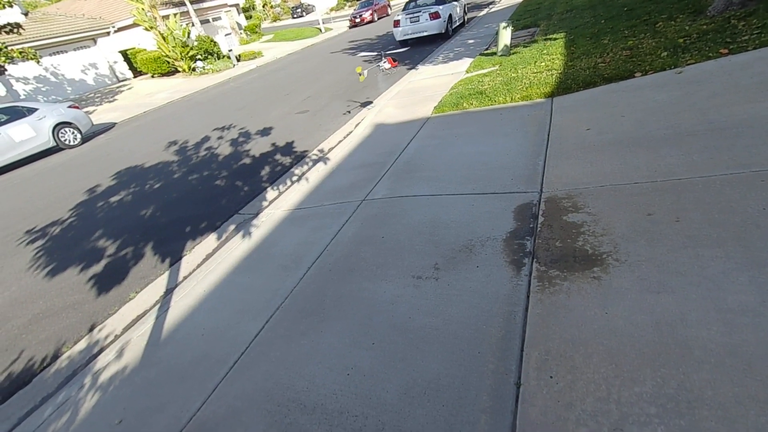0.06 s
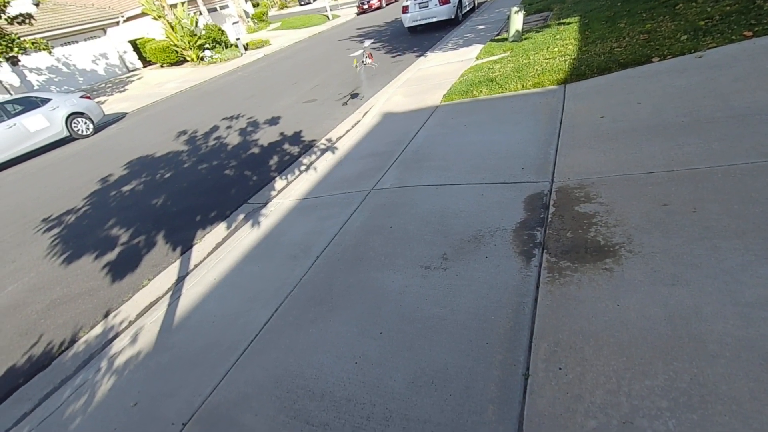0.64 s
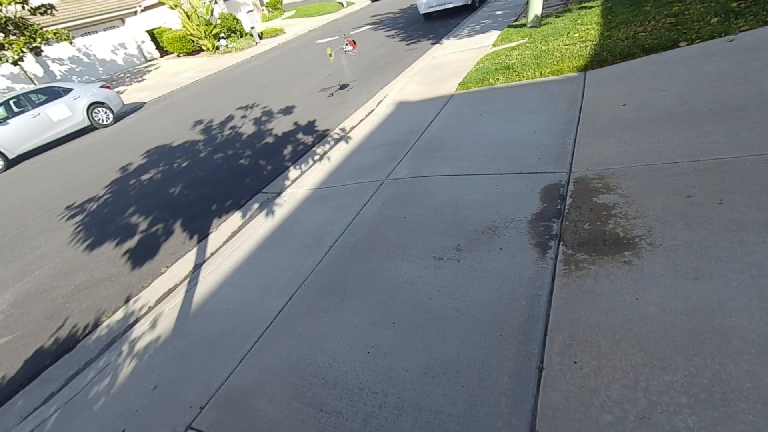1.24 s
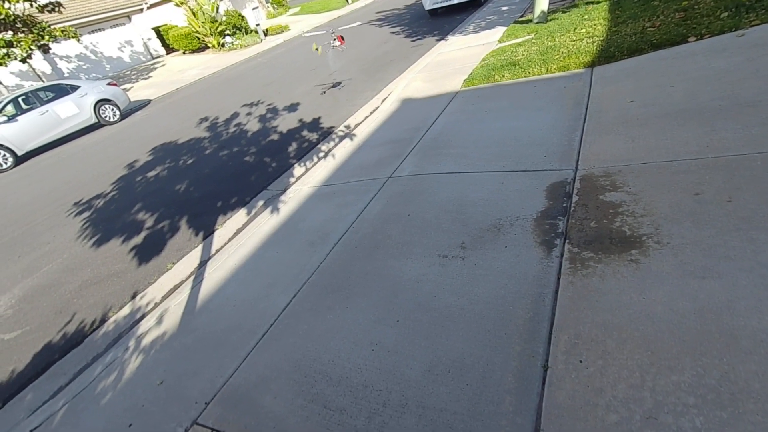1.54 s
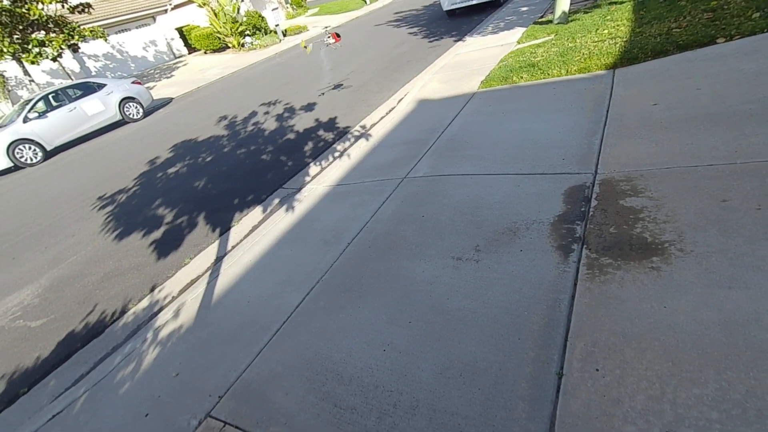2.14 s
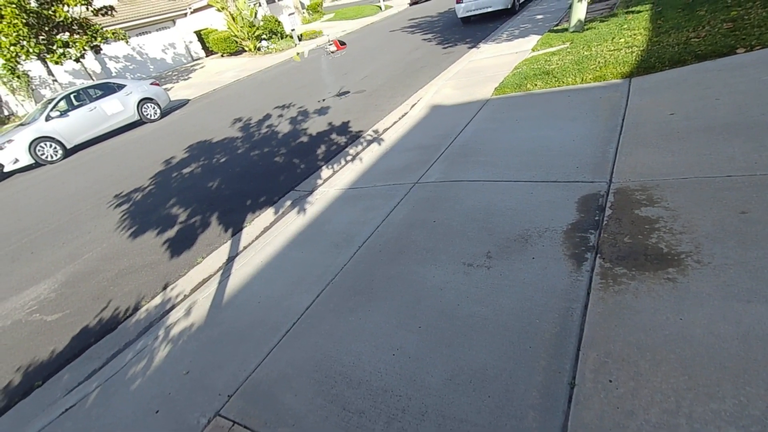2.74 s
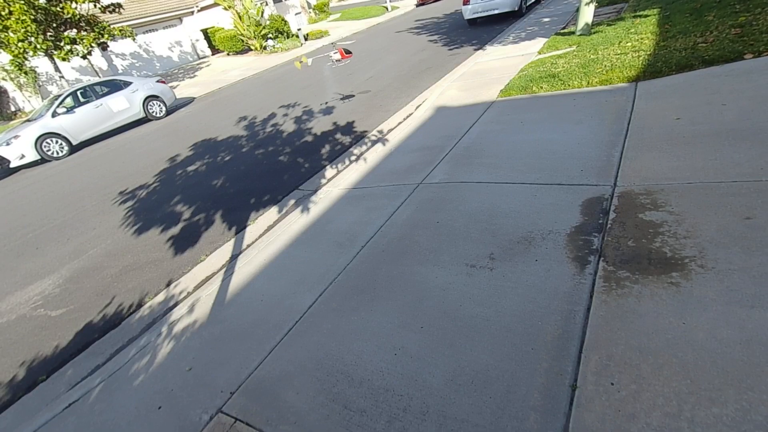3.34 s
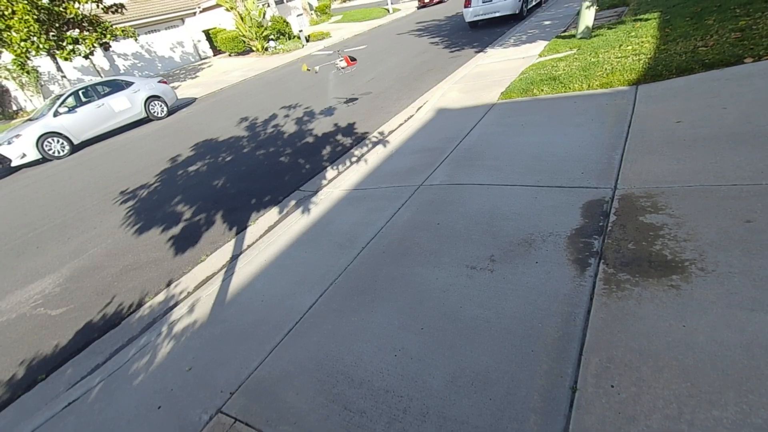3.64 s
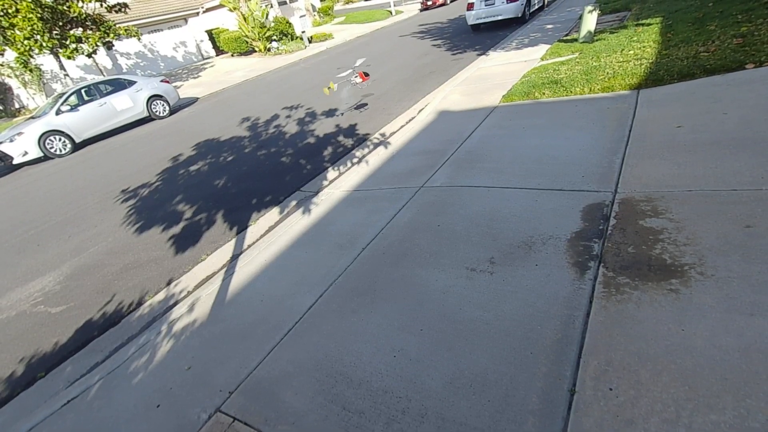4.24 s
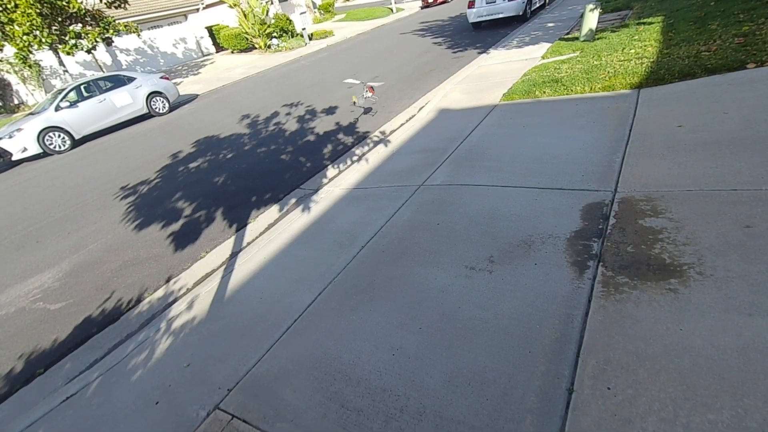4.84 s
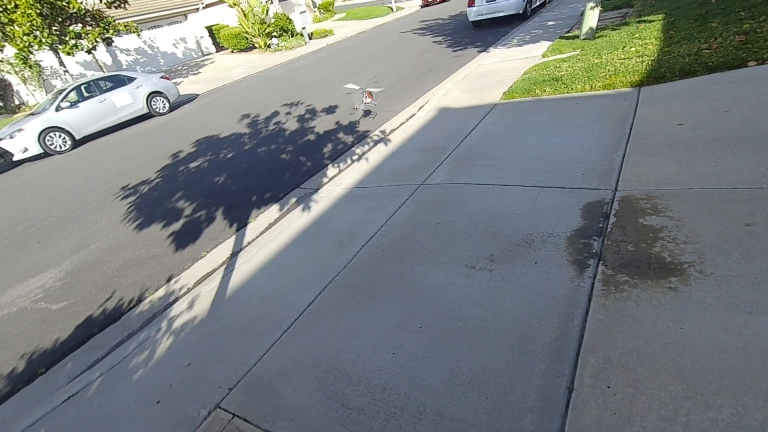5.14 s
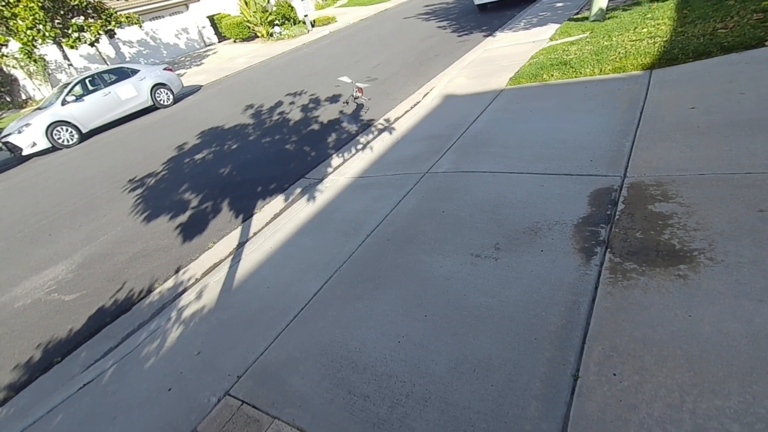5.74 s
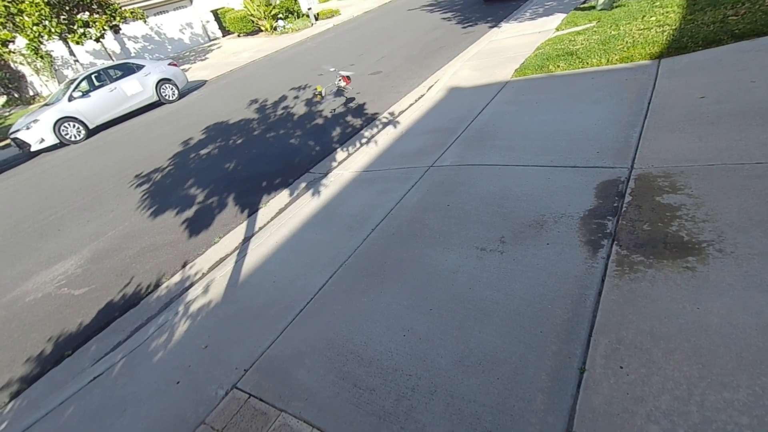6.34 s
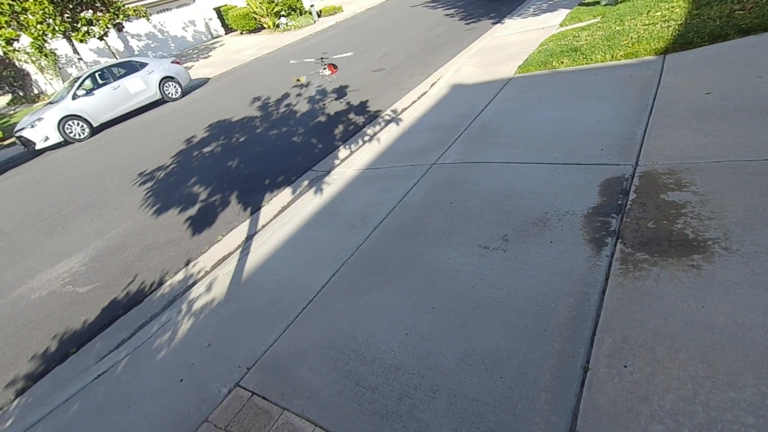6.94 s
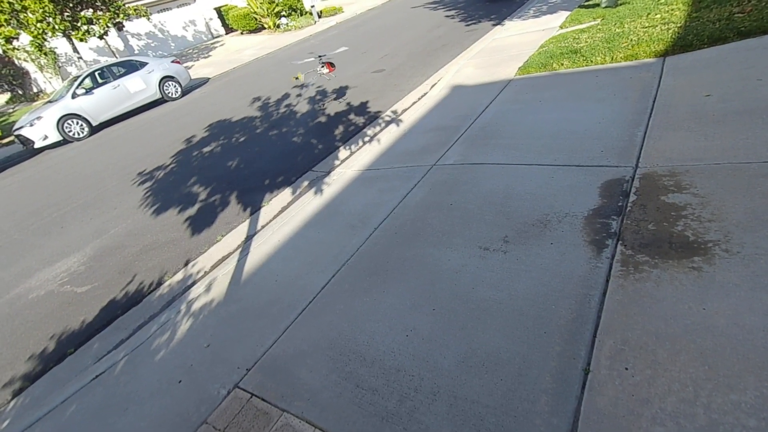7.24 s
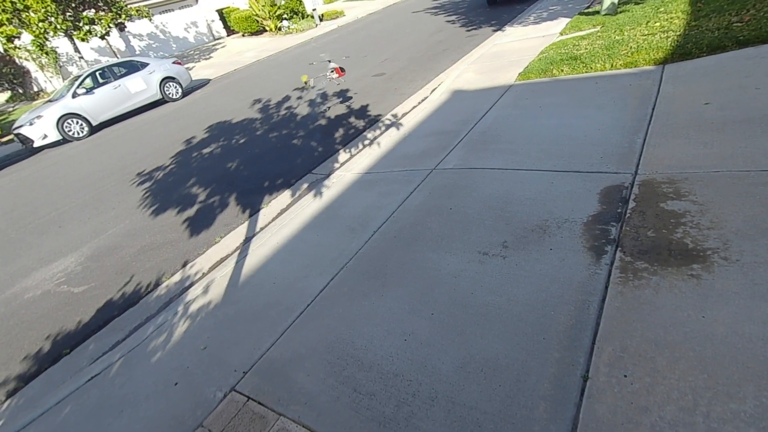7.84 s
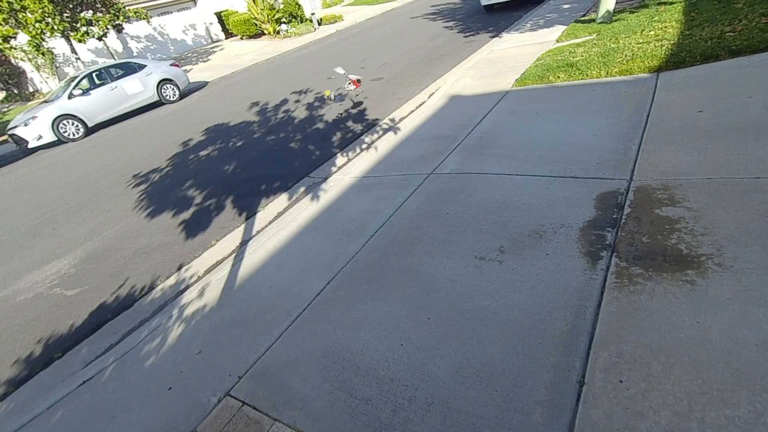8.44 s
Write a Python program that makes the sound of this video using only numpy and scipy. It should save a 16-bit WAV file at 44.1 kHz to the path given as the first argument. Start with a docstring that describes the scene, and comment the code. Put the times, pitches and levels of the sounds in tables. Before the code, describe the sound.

Outdoors on a street, the tiny fuel engine of a hovering model helicopter buzzes without a break, heard from a few metres away. The buzz is thin and nasal, with a ringing high whine whose colour keeps shifting as the model turns, rises and dips. The engine speed barely changes, though the loudness drifts down and comes back up. Beneath it are a light hiss of gears and a faint flutter of blades, with slight echoes from walls.

```python
"""On a street, a small model helicopter with a glow engine hovers a few metres away.
Its two-stroke engine runs rich (extra fuel) and fires hard only on every other turn. Each pop rings
in the muffler, and the pops blur into a buzzing whine. Gears hiss, and the rotor throbs underneath.
The road mirrors the sound. That echo lags more as the model climbs, so the whine sweeps up and down."""
import sys
import numpy as np
from scipy import signal
from scipy.fft import rfft, irfft, next_fast_len
from scipy.io import wavfile
from scipy.ndimage import uniform_filter1d, map_coordinates

SR = 44100
rng = np.random.default_rng(int(sys.argv[2]) if len(sys.argv) > 2 else 0)


def unload_wav(signal):
    """Save mono or channel-first audio to the path in sys.argv[1] as 16-bit WAV at rate SR, clipped to [-1, 1]."""
    wavfile.write(
        sys.argv[1],
        SR,
        np.round(np.clip(np.atleast_2d(signal).T, -1, 1) * 32767).astype(np.int16),
    )


N = 378819
T = np.arange(N) / SR
FIRINGS_PER_ROTOR_TURN = 3.965

# hard firings per second: t/s, f/Hz
FIRING_RATE = [(0.0, 128.2), (0.07, 127.5), (0.36, 129.1), (0.6, 128.6), (0.88, 127.2), (1.17, 127.3),
               (1.32, 126.2), (1.53, 126.6), (1.7, 125.6), (1.94, 125.9), (2.27, 125.1), (3.64, 126.1),
               (3.92, 124.3), (4.55, 126.4), (4.71, 125.7), (5.28, 128.0), (5.53, 126.4), (5.86, 125.7),
               (6.15, 127.1), (6.29, 126.0), (6.87, 124.9), (7.25, 125.4), (7.63, 125.0), (8.21, 126.3),
               (8.4, 127.8), (8.59, 127.8)]
# the exhaust outlet points toward us or away: t/s, level/dB, extra rasp/dB, extra treble/dB
BEAM = [(0, -14, 2.5, 4.5), (.65, -10.5, 1.5, 2), (1.2, -14.5, 3, 3.5), (1.55, -16, 4, 5.5),
        (2.25, -17.5, 5, 5), (3.1, -19.5, 2.5, 3.5), (3.75, -21, 4.5, 5.5), (4.2, -14, 2.5, 3.5),
        (4.7, -14, 2.5, 6.5), (5.3, -15.5, 8, 4.5), (5.55, -15.5, 7, 4), (5.9, -12, 4.5, 6.5),
        (6.15, -12, 3.5, 5), (6.7, -10.5, 2, 4), (7, -16.5, 1, 6), (7.4, -15, 3.5, 6.5), (7.75, -13, -1, 4),
        (8.59, -10, 2, 3)]
# gain of the highest fizz: t/s, level/dB
FIZZ = [(0, -3), (.25, -3), (.6, -6), (2.5, 0), (3.2, -2.5), (3.7, 0), (4.7, -4.5), (5.3, -1.5),
        (5.6, -3.5), (5.88, -1), (6.15, -5), (6.7, -5), (7, -0.5), (8.59, -5.5)]
# tone colour of the whole exhaust: f/Hz, level/dB
EXHAUST_COLOUR = [(60, -42), (126, -18), (370, -15), (520, -4), (800, 0), (1300, -2), (1750, 0),
                  (2000, -1.5), (2900, 2), (4100, -2.5), (5200, -4.5), (7200, -8), (9200, -9.5),
                  (11000, -4.5), (15700, -7.5)]
# tone colour of a puff of gas before the muffler: f/Hz, level/dB
PUFF_COLOUR = [(200, -36), (1000, -7.5), (2500, -5.5), (3400, 1), (4200, 1.5), (5200, -2.5), (8000, 4.5),
               (15000, 1.5)]
# pitches that the muffler and frame boost or weaken: f/Hz, width/Hz, level/dB
RESONANCES = [(1757, 45, 4), (1860, 62, 9), (2085, 100, 1.5), (2300, 92, 0), (2230, 130, 4),
              (2910, 110, -10.5), (3360, 150, -0.5), (3470, 380, 1.5), (3530, 390, 3), (4000, 200, -2),
              (4093, 160, 5), (4810, 49, 4), (5170, 680, -2.5), (5730, 81, 7.5), (5930, 380, 5.5),
              (8050, 390, 3.5), (8310, 310, 3.5), (10260, 410, 7.5), (12060, 300, 7.5), (12580, 260, 6.5),
              (13600, 490, 7.5), (16000, 1400, 3)]
# loudness of the engine's whine in five side-by-side bands from 1.7 to 3.7 kHz,
# each named for how it sounds: t/s, level/dB
NASAL_RING = [(0.0, -27), (0.55, -22.5), (1.25, -28.5), (1.95, -23), (2.05, -27.0), (2.75, -24.5),
              (3.55, -27.5), (4.0, -32), (4.3, -23), (4.85, -29.5), (5.35, -22.5), (5.6, -29), (6.0, -28.0),
              (6.4, -21.0), (6.95, -27.0), (7.95, -29), (8.05, -22), (8.59, -20)]
WHISTLE_RING = [(0.0, -25.5), (0.6, -26.5), (1.4, -21.5), (1.85, -25.5), (2.1, -21), (2.7, -26.5),
                (2.95, -24.5), (3.3, -29.5), (4.15, -23.5), (4.35, -25.0), (4.95, -23), (5.05, -29.5),
                (6.15, -25), (6.5, -27.0), (7.0, -20), (8.05, -21.5), (8.25, -27.5), (8.59, -18.0)]
MID_RASP = [(0.0, -22), (0.5, -25.5), (1.4, -30.5), (1.7, -28.5), (3.7, -29), (3.9, -32), (4.25, -26),
            (4.55, -28), (4.75, -23.5), (5.55, -27.5), (5.9, -24), (6.35, -28), (6.5, -26), (7.9, -28.5),
            (8.05, -25), (8.59, -26)]
LOW_WHINE = [(0.0, -21.5), (0.2, -25), (1.05, -19), (1.4, -26.5), (1.65, -20), (2.85, -31.5), (3.4, -22.0),
             (3.9, -27), (4.25, -24), (4.45, -26), (4.6, -18.5), (4.95, -26), (5.35, -20.5), (5.9, -26.0),
             (6.2, -16.5), (6.35, -21.5), (6.85, -19), (7.1, -25.5), (7.65, -28), (8.0, -19.0), (8.35, -29),
             (8.59, -19)]
HIGH_WHINE = [(0.0, -25.5), (0.75, -21), (1.15, -27.5), (1.45, -20.0), (1.8, -26), (2.15, -21.5),
              (3.3, -26), (3.85, -23), (4.05, -28.0), (4.25, -16.5), (4.5, -32), (4.6, -17), (5.0, -24.5),
              (5.1, -18), (5.8, -24.5), (6.15, -16), (6.35, -27), (6.65, -17.0), (6.95, -30), (7.2, -20.5),
              (7.75, -24.5), (8.1, -18), (8.59, -24)]
# those bands: lower f/Hz, upper f/Hz, level table, overtone that sings in it, its boost/dB
WHINE_BANDS = [(1690, 2120, NASAL_RING, 16, 5), (2120, 2600, WHISTLE_RING, 18, 0),
               (2600, 3080, MID_RASP, 22, 2), (3080, 3440, LOW_WHINE, 26, 5),
               (3440, 3740, HIGH_WHINE, 28, 7)]
# low overtones with their own level curves: multiple of the firing rate -> rows of t/s, level/dB
OVERTONE_CURVES = { 1: [(0.0, -43), (1.0, -36.5), (3.6, -43.5), (4.35, -36), (5.6, -36.0), (7.15, -39.5),
                   (7.25, -41), (8.59, -36.5)], 3: [(0, -64), (.6, -50), (3.6, -49), (4.3, -57), (4.7, -43),
                   (5.35, -33.5), (6.1, -43.5), (6.6, -62), (8.59, -54)], 4: [(0.0, -43.0), (1.05, -46),
                   (1.9, -33), (4.45, -44.5), (5.35, -37.5), (5.55, -48), (5.65, -37.5), (6.55, -41),
                   (7.3, -36.5), (8.59, -42)], 6: [(0.0, -42.0), (0.55, -36), (0.95, -52.5), (1.1, -39.5),
                   (3.55, -39.5), (3.95, -30.5), (5.2, -53), (5.3, -41.0), (5.7, -59), (6.35, -35.5),
                   (8.59, -37)], 7: [(0.0, -32.5), (1.6, -31), (1.8, -38), (3.35, -39), (4.3, -31),
                   (4.75, -52), (4.9, -40), (6.6, -29.5), (7.25, -31.5), (8.59, -37)], 8: [(0.0, -29),
                   (0.85, -28.5), (2.05, -46), (2.55, -33), (2.85, -43.5), (4.2, -38), (4.4, -33),
                   (5.65, -35), (6.1, -30.5), (7.4, -37.5), (8.59, -27)], 10: [(0.0, -34), (0.65, -54),
                   (0.7, -39), (3.7, -32), (4.15, -37), (4.75, -29.5), (5.15, -37.5), (6.1, -33.5),
                   (6.5, -42), (7.65, -32), (8.0, -45), (8.59, -30.0)], 12: [(0.0, -29), (1.0, -27),
                   (2.3, -32.5), (2.4, -28.5), (3.15, -31.5), (3.75, -40), (3.9, -31), (4.65, -29),
                   (4.75, -40.5), (5.05, -31), (5.2, -43), (5.6, -29), (5.85, -44), (6.25, -29.5),
                   (6.85, -29.5), (7.0, -38), (8.15, -28.5), (8.59, -33)]}
# low overtones with one base level each: multiple of the firing rate, level/dB, share of road echo
OVERTONE_LEVELS = [(5, -39.5, 0.47), (9, -39, 0.38), (11, -43, 0), (13, -40, 0)]
# hum of the crankshaft: t/s, level/dB
CRANK_HUM = [(0.0, -24), (0.12, -24), (1.1, -32), (2.87, -30.5), (4.11, -25.5), (4.55, -21), (5.91, -19),
             (7.15, -24.5), (8.54, -20.5), (8.59, -21)]
# tones of the main and tail rotors: multiple of the main rotor's turning rate, level/dB
ROTOR_TONES = [(2, -44.5), (3, -55), (3.43, -51.5), (5, -54), (7, -53), (9, -49.5), (10, -47.5), (11, -62),
               (13, -48), (14, -52), (15, -49), (17, -49.5), (18, -51)]
# air stirred by the blades, plus street rumble: f/Hz, level/dB
WASH_COLOUR = [(8, -6), (25, 15), (50, 14), (80, -8), (120, 13), (200, 6.5), (400, 12.5), (800, -3.5),
               (1500, -7), (3000, -33), (15000, -35)]
# gear hiss before the muffler and frame colour it: f/Hz, level/dB
HISS_COLOUR = [(400, -6), (900, -4), (1500, -4.5), (2600, 3), (3400, -4), (5000, 4.5), (9000, -21.5),
               (15000, -28)]
# the model climbs and sinks twice above the road: t/s, height/m
HEIGHT = [(0, .79), (.59, .73), (2.07, 1.17), (2.85, 1.23), (3.76, 1.04), (4.94, .48), (5.56, .42),
          (7.12, .975), (7.77, .935), (8.59, .615)]
# the road's treble echo when the model is lowest: f/Hz, share from 0 to 1
ROAD_TREBLE = [(3800, .33), (5300, .33), (6000, .43), (8200, .42), (9500, .3), (15000, .3)]
# tone colour of the echoes from walls and cars: f/Hz, level/dB
HOUSES_COLOUR = [(250, 8), (550, 10), (1200, -6), (2100, 4.5), (3400, -.5), (4300, -1), (6000, -2.5),
                 (8500, 1.5), (12000, 2)]


def engine(turns, gain_db=1.22, direct_db=-1, houses_db=-9, hiss_db=-11):
    """Exhaust pops swell as the outlet turns toward us; wall echoes and gear hiss change far less."""
    pops = exhaust(turns)
    hiss = gear_hiss()
    direct = amp(direct_db + .9 * beam_swing()) * road(airframe(pops))
    around = amp(houses_db) * houses(pops) + amp(hiss_db) * unit(hiss + .5 * road(hiss))
    sound = beamed(direct + amp(.032 * beam_swing()) * around)
    return shifting_whine(amp(curve(BEAM).mean() + gain_db) * sound, turns)


def firing_turns(ripple_cycles=.004):
    """Counts firing cycles so far. The rotor's load speeds and slows the engine once per rotor turn."""
    rate_hz = curve(FIRING_RATE) * (1 + .0007 * drift(15))
    turns = np.cumsum(rate_hz) / SR
    return turns + ripple_cycles * np.sin(rotor_angle(turns))


def exhaust(turns, weak_db=-15.5, puff_db=-5, swap_at_s=7.24, swap_length_s=.05):
    """Each hard firing gives a crack and a bright puff of gas; the turn between gives a dull pop."""
    # the hard firings move over, once, to the other turn of the crankshaft
    swap = np.pi / 2 * np.clip((T - swap_at_s) / swap_length_s + .5, 0, 1)
    clicks, gas_flow = 0, 0
    for share, cycle in [(np.cos(swap), turns), (np.sin(swap), turns - .5)]:
        hard = pulses(cycle, spread_db=.6)
        weak = filtered(pulses(cycle + .5, spread_db=2), lambda f: lowpass(f, 4200, 10))
        clicks = clicks + share * (hard + amp(weak_db) * weak)
        gas_flow = gas_flow + share * np.exp(-(cycle % 1))
    crack = filtered(smear(clicks), lambda f: 1 - lowpass(f, 1650, 40))
    puff = unit(gas_flow * noise(PUFF_COLOUR))
    throb = 1 + .031 * np.sin(rotor_angle(turns))
    return muffler((amp(puff_db) * puff - crack) * throb)


def pulses(turns, spread_db, jitter_ms=.009):
    """One sharp click per firing cycle, a little uneven in size and timing."""
    whole = np.arange(np.ceil(turns[0]), turns[-1])
    size, late = rng.standard_normal((len(whole), 2)).T
    at = (np.interp(whole, turns, T) + late * jitter_ms / 1000) * SR
    taps = at.astype(int)[:, None] + np.arange(-7, 9)
    offset = taps - at[:, None]
    # the sinc shape lets a click fall between two samples
    clicks = amp(spread_db * size)[:, None] * np.sinc(offset) * np.sinc(offset / 8)
    return unit(np.bincount(np.clip(taps, 0, N - 1).ravel(), clicks.ravel(), N))


def smear(x, tail_db=9, decay_s=.0012, size=2048):
    """Echoes inside the muffler draw each crack out without changing its tone colour."""
    t = np.arange(size) / SR
    tail = rng.standard_normal(size) * np.exp(-t / decay_s)
    response = rfft((t == 0) + amp(tail_db) * tail / np.linalg.norm(tail))
    allpass = np.roll(irfft(response / abs(response)), size // 2)
    return signal.oaconvolve(x, allpass)[size // 2:][:N]


def muffler(x, size=4096):
    """The muffler is a small can: whatever goes in rings briefly at the can's own pitches."""
    hz = abs(np.fft.fftfreq(size, 1 / SR))
    peaks_db = sum(db / (1 + (2 * (hz - f) / width) ** 2) for f, width, db in RESONANCES)
    gain = amp(spectrum(EXHAUST_COLOUR, hz) + peaks_db)
    response = np.exp(np.conj(signal.hilbert(np.log(gain))))  # rings after a pop, not before
    ring = np.fft.ifft(response).real[:size // 2]
    return unit(signal.oaconvolve(x, ring)[:N])


def beamed(x):
    """The outlet throws high sounds forward, so they swell and fade as the model turns."""
    rasp, treble, fizz = curve(BEAM, column=2), curve(BEAM, column=3), curve(FIZZ)
    for db, hz, width_hz in [(rasp, 4000, 700), (treble, 7000, 2200), (fizz, 12000, 3200)]:
        x = x + (amp(db) - 1) * band_around(x, hz, width_hz)
    return x


def shifting_whine(x, turns, sing_width_hz=40, smooth_s=.09, edge_hz=60):
    """The whine swells and fades in five side-by-side bands, so its loudest pitch moves about."""
    out, pole = x, np.exp(-np.pi * sing_width_hz / SR)
    for low_hz, high_hz, level, order, boost_db in WHINE_BANDS:
        band = filtered(x, lambda f: np.clip((f - low_hz) / edge_hz + .5, 0, 1)
                        * np.clip((high_hz - f) / edge_hz + .5, 0, 1))
        # a narrow filter follows one overtone and picks it out
        spin = np.exp(2j * np.pi * order * turns)
        overtone = 2 * (spin * signal.lfilter([1 - pole], [1, -pole], band / spin)).real
        whine = band + (amp(boost_db) - 1) * overtone
        power = abs(uniform_filter1d(whine ** 2, round(smooth_s * SR)))
        out = out - band + whine * amp(curve(level)) / np.sqrt(power + 1e-12)
    return out


def drone(turns, curves_db=-.85, waver_db=2.5, waver_hz=6.6):
    """The firing's low overtones leave the muffler as smooth tones that swell, fade and waver."""
    swing_db, out = .93 * beam_swing(), 0
    for order, level in OVERTONE_CURVES.items():
        tone = np.sin(2 * np.pi * (order * turns + rng.random()))
        out = out + amp(curve(level) + curves_db + drift(waver_hz)) * tone
    for order, db, share in OVERTONE_LEVELS:
        tone = np.sin(2 * np.pi * (order * turns + rng.random()))
        gain = amp(db + swing_db + waver_db * drift(waver_hz))
        out = out + gain * (tone + share * mirrored(tone)) / np.hypot(1, share)
    return np.sqrt(2) * out


def crank_hum(turns):
    """The clean tone of the crankshaft, which turns twice for each hard firing."""
    return np.sqrt(2) * amp(curve(CRANK_HUM)) * np.sin(2 * np.pi * 2 * turns)


def rotors(turns, tones_db=-1, wash_db=-42, fuller_db_per_m=6):
    """Blade tones, and air that swishes as each of two blades passes; fuller when the model is high."""
    angle, up = rotor_angle(turns), height()
    wavers_db = [drift(.9) for _ in range(3)]
    tones = sum(amp(db + wavers_db[k % 3]) * np.sin(order * angle + 2 * np.pi * rng.random())
                for k, (order, db) in enumerate(ROTOR_TONES))
    wash = unit(noise(WASH_COLOUR)) * (1 + np.sin(2 * angle))
    sound = np.sqrt(2) * amp(tones_db) * tones + amp(wash_db) * wash
    fullness = amp(fuller_db_per_m * (up - up.mean()))
    sound = sound + (fullness - 1) * band_around(sound, hz=330, width_hz=165)
    with_echo = unit(unit(sound) + 2 * road(sound))
    return sound.std() * with_echo * amp(.15 * beam_swing())


def gear_hiss():
    """The gears make a steady hiss, coloured by the muffler and frame."""
    return muffler(noise(HISS_COLOUR))


def airframe(x, scatter_db=-7, decay_s=.0014, change_hz=2.2, count=4, size=512):
    """Body and skids scatter the treble; as the model rocks, narrow bands flare and fade."""
    t = np.arange(size) / SR
    treble = filtered(x, lambda f: lowpass(f, 15000, 4) - lowpass(f, 7000, 4))
    for _ in range(count):
        taps = unit(rng.standard_normal(size) * np.exp(-t / decay_s)) / np.sqrt(size * count)
        x = x + amp(scatter_db) * drift(change_hz) * signal.oaconvolve(treble, taps)[:N]
    return unit(x)


def road(x, low_share=.55, split_hz=3800, treble_loss_per_m=.25):
    """Adds the road's echo. It boosts some pitches and cancels others, and these slide with height."""
    up, echo = height(), mirrored(x)
    low = filtered(echo, lambda f: lowpass(f, split_hz, 20))
    treble = filtered(echo - low, lambda f: spectrum(ROAD_TREBLE, f))
    return unit(x + low_share * low + treble * np.exp(-treble_loss_per_m * (up - up.min())))


def mirrored(x, distance_m=6, ear_height_m=1.5, sound_m_per_s=343):
    """Sound that bounces off the road travels further, so it arrives later when the model is higher."""
    up = height()
    detour_m = np.hypot(distance_m, up + ear_height_m) - np.hypot(distance_m, up - ear_height_m)
    return map_coordinates(x, [np.arange(N) - detour_m / sound_m_per_s * SR], order=3)


def houses(x, fade_s=.1, echoes_per_s=1500, change_hz=1.51, count=4):
    """Echoes from walls and parked cars shift as the model drifts, so each overtone wavers."""
    t = np.arange(SR // 2) / SR
    fade = (t > .003) * amp(-60 * t / fade_s)
    weights = np.array([drift(change_hz) for _ in range(count)])
    out = np.zeros(N)
    for weight in weights / np.linalg.norm(weights, axis=0):
        taps = rng.standard_normal(len(t)) * (rng.random(len(t)) < echoes_per_s / SR) * fade
        out += signal.oaconvolve(x, taps / np.linalg.norm(taps))[:N] * weight
    return unit(filtered(out, lambda f: amp(spectrum(HOUSES_COLOUR, f))))


def height(glide_s=.5):
    """Height in metres; the model cannot change course at once, so its path is smoothed."""
    return uniform_filter1d(curve(HEIGHT), round(glide_s * SR), mode="nearest")


def rotor_angle(turns):
    """How far the main rotor has turned, in radians."""
    return 2 * np.pi * turns / FIRINGS_PER_ROTOR_TURN


def beam_swing():
    """How many dB the outlet's beam is above or below its average."""
    level = curve(BEAM)
    return level - level.mean()


def amp(db):
    """Turns decibels into a gain."""
    return 10 ** (np.asarray(db) / 20)


def unit(x):
    """Scales a signal to an average size (rms) of 1."""
    return x / np.sqrt(np.mean(x ** 2) + 1e-20)


def curve(rows, column=1):
    """Joins one column of a time table with straight lines."""
    columns = np.transpose(rows)
    return np.interp(T, columns[0], columns[column])


def spectrum(points, hz):
    """Reads between the rows of a frequency table, spacing octaves evenly."""
    f, value = np.transpose(points)
    return np.interp(np.log(hz + 1), np.log(f), value)


def filtered(x, gain):
    """Scales each frequency f in a signal by gain(f)."""
    size = next_fast_len(N + 4096)
    return irfft(rfft(x, size) * gain(np.fft.rfftfreq(size, 1 / SR)), size)[:N]


def lowpass(f, edge_hz, steepness):
    """A gain that falls from 1 to 0 around the edge."""
    return 1 / (1 + (f / edge_hz) ** steepness)


def band_around(x, hz, width_hz):
    """Keeps the part of a sound near one frequency."""
    return filtered(x, lambda f: np.exp(-((f - hz) / width_hz) ** 2))


def noise(colour):
    """Noise with the tone colour given by a table."""
    return filtered(rng.standard_normal(N), lambda f: amp(spectrum(colour, f)))


def drift(rate_hz):
    """A slow random wander of average size 1."""
    return unit(band_around(rng.standard_normal(N), 0, rate_hz))


def scene():
    """Engine and rotors are geared to one shaft, so they all follow the same count of cycles."""
    turns = firing_turns()
    return (engine(turns) + drone(turns) + crank_hum(turns) + rotors(turns))[None]


def record(dry, ceiling=.97, top_hz=15780):
    """Rounds off the tallest cracks, then removes the very highest treble."""
    limited = dry / (1 + (dry / ceiling) ** 12) ** (1 / 12)
    treble_cut = signal.firwin(1023, top_hz, window=("kaiser", 9), fs=SR)
    return signal.oaconvolve(limited, treble_cut[None], "same")


dry = scene()
out = record(dry)
unload_wav(out)
```